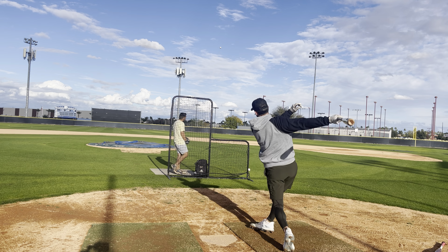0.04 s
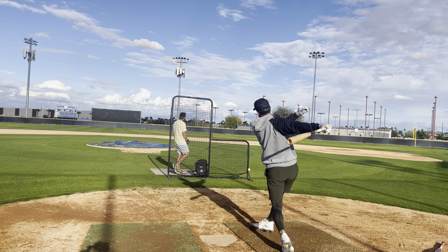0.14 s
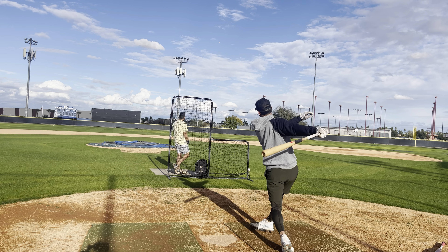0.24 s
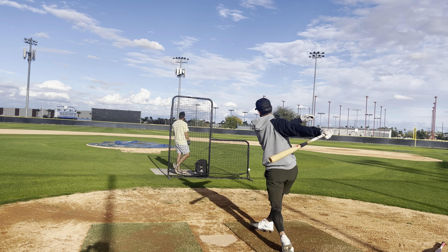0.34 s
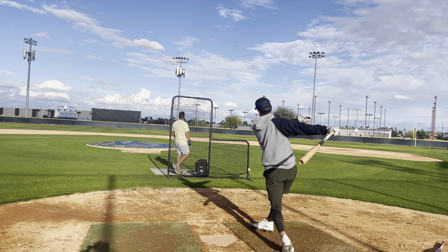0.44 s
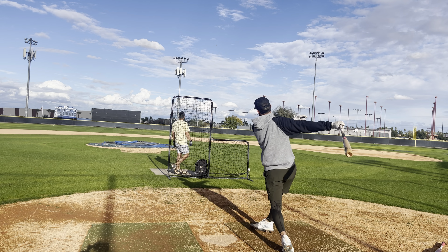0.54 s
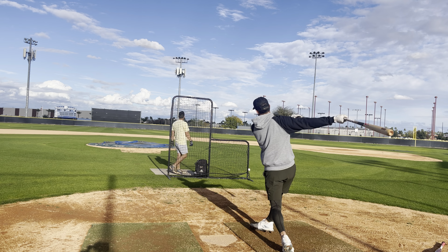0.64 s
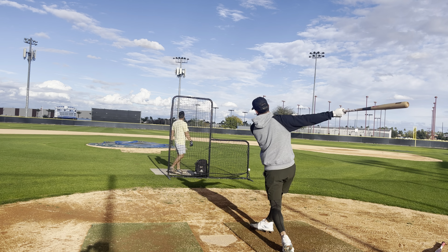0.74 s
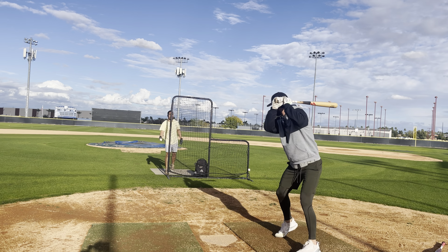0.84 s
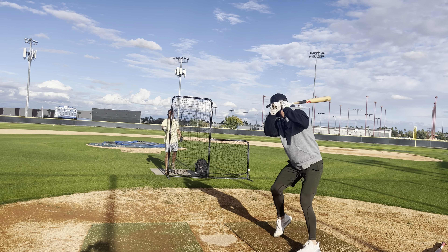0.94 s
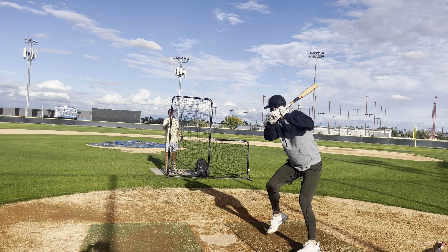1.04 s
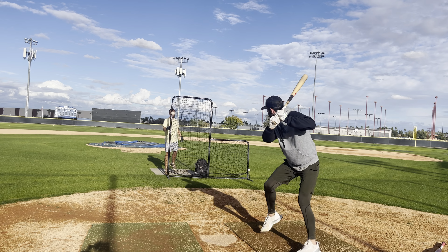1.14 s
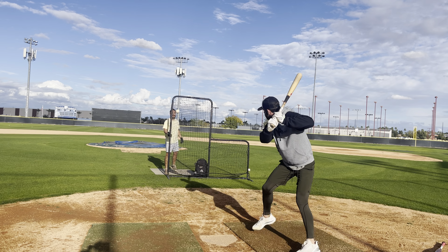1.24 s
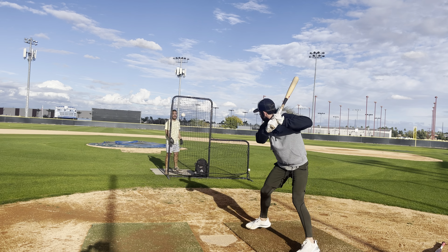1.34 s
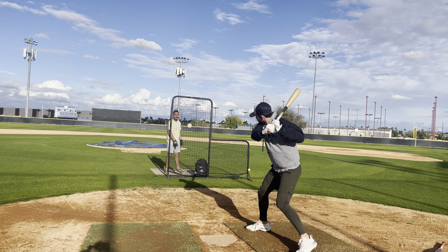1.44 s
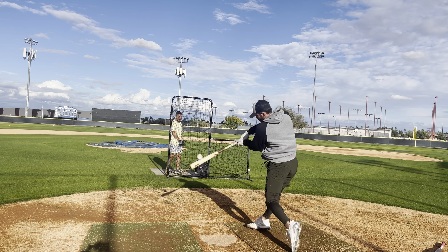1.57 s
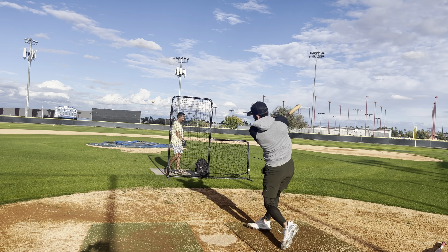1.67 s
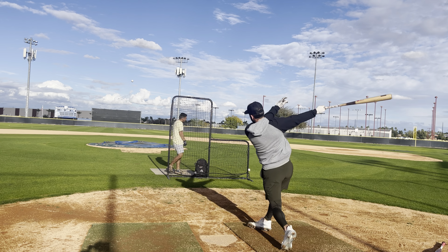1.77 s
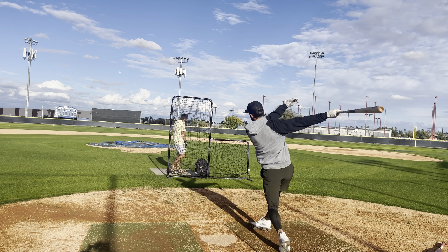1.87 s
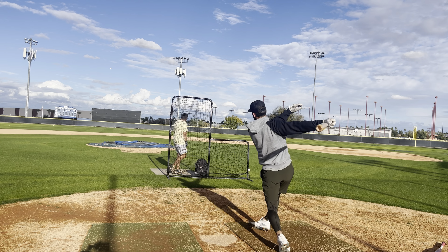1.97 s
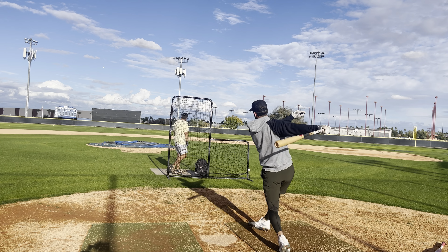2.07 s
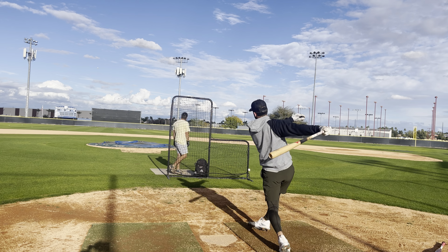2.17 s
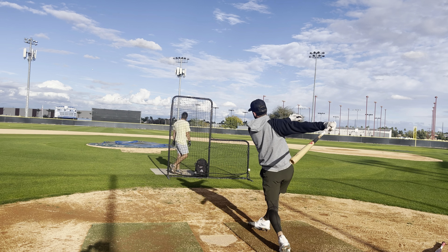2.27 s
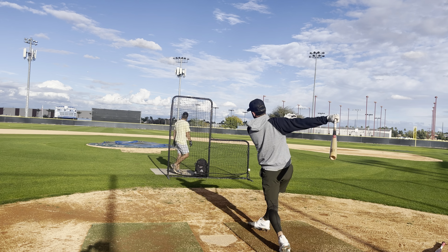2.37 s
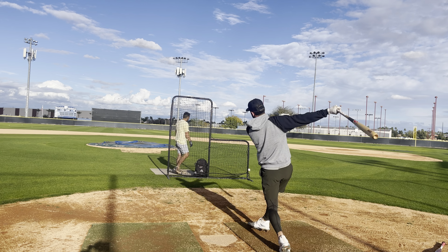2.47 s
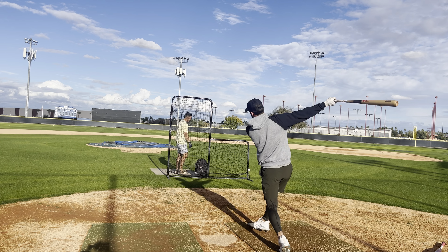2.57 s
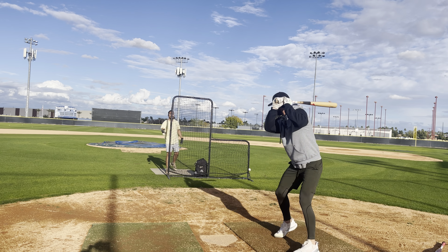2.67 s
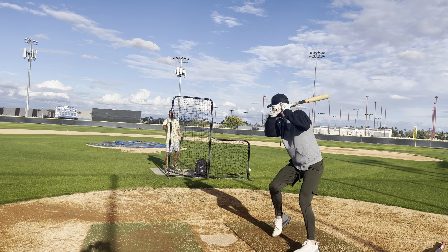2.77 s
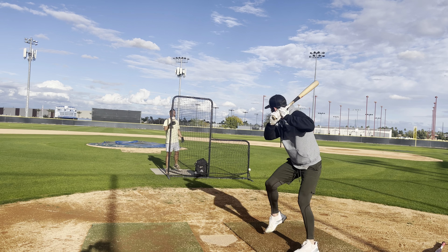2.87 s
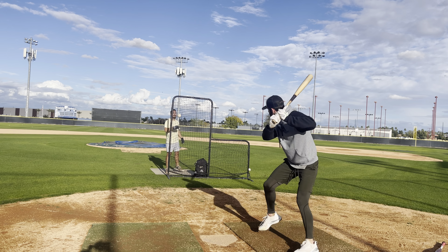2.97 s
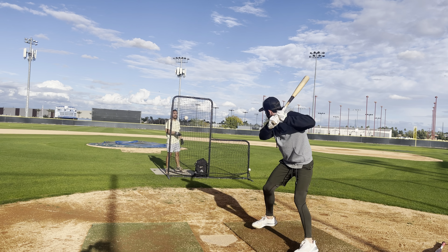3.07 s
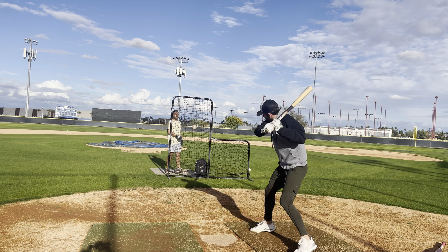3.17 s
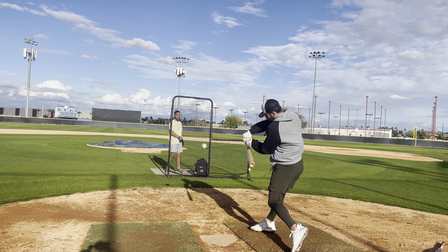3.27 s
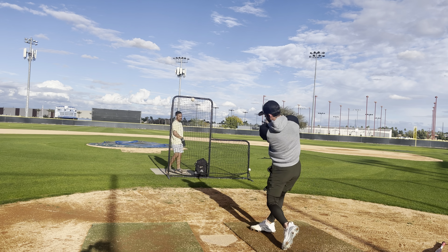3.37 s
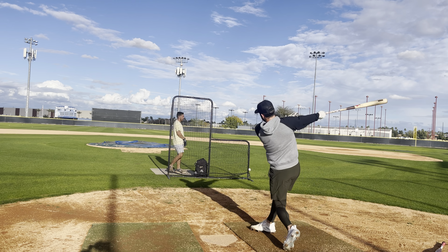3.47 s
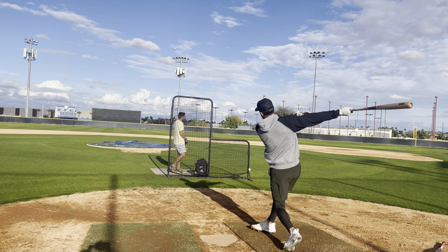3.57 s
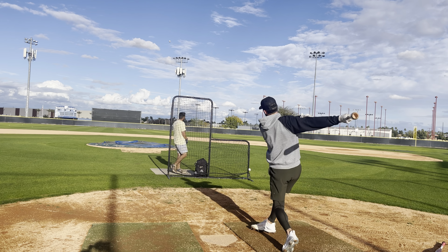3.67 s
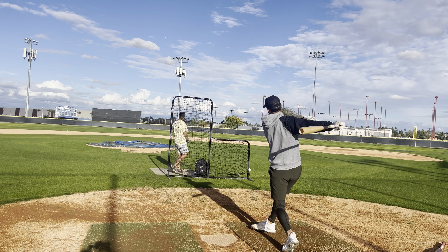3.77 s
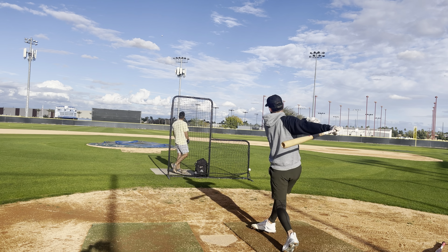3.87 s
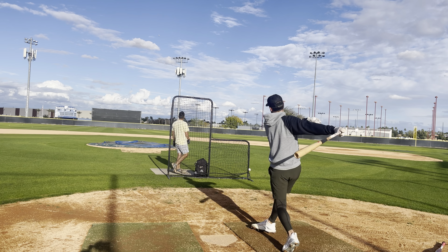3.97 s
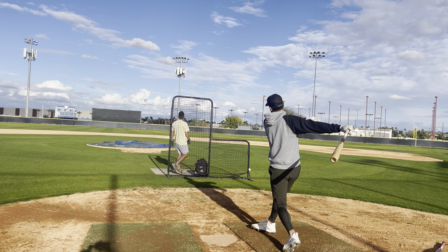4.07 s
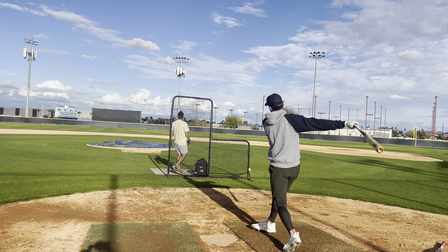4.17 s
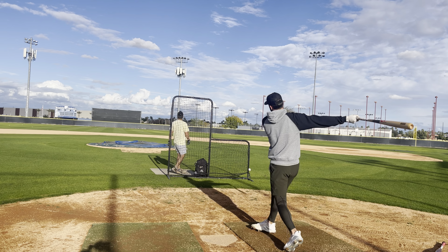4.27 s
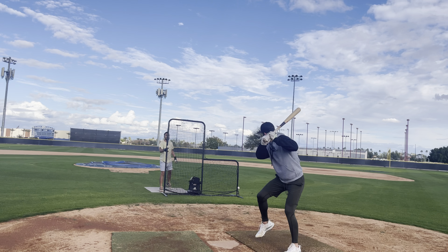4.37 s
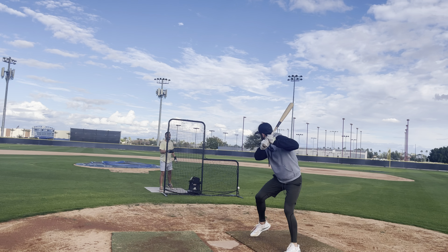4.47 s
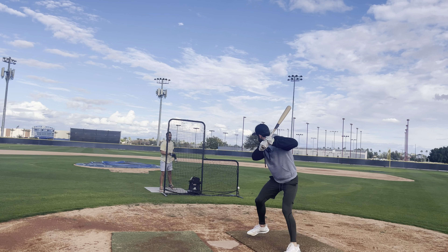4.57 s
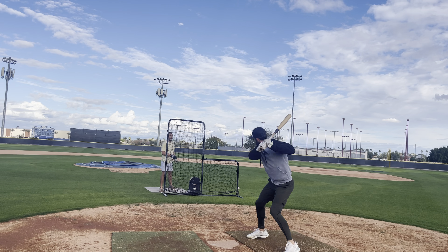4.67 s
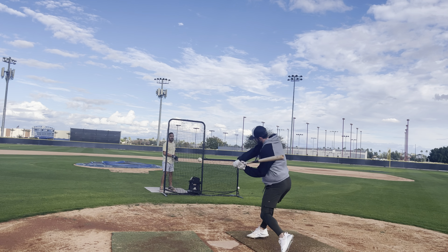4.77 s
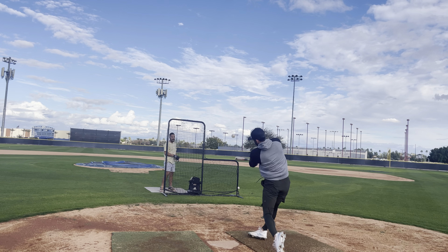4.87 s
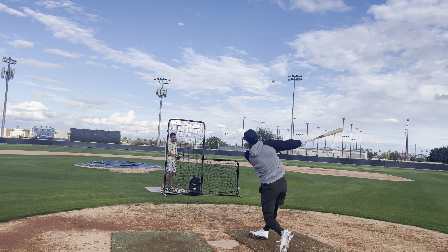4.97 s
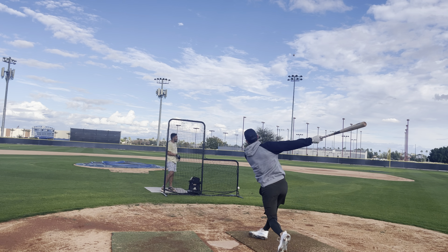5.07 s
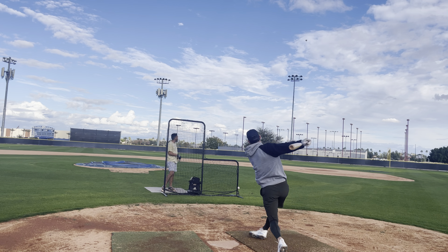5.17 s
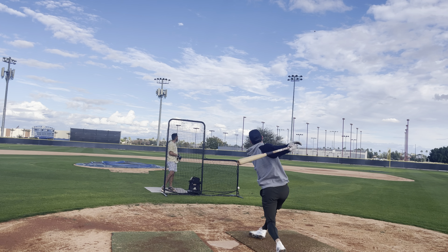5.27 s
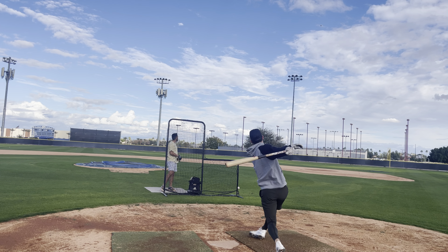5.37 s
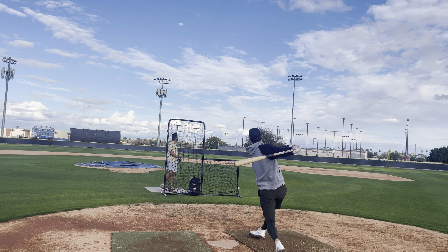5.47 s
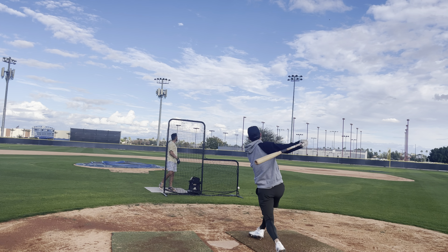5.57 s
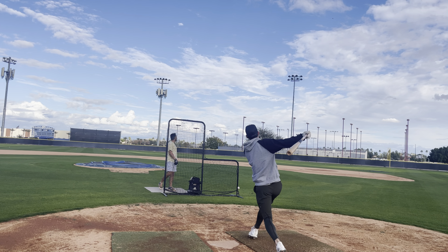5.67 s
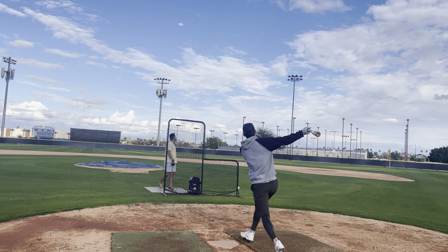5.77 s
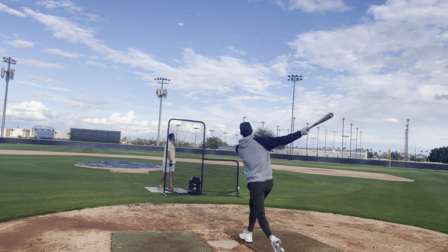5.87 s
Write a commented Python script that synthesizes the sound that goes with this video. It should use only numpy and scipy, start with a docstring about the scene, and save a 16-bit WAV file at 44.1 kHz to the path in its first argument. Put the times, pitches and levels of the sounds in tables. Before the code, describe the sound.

Three hard bat-on-ball cracks with quick slapping echoes, soft foot scuffs and cloth rustle between them, and a steady far drone beneath.

```python
"""A wooden bat cracks on tossed balls on an open field: each contact strikes the modes of the bat.
A screen, a stand and scattered walls throw the crack back as smeared echoes and a lumpy, dying scatter of noise.
The batter's clothes and shoes follow each swing as shaped noise, with short noise ticks and thuds.
Far machinery and traffic rumble on the right as a resonant drone and coloured noise, with a faint tone.
The level dips briefly three times, and a limiter ducks the field after each crack."""
import sys
import numpy as np
from scipy import signal
from scipy.fft import rfft, irfft
from scipy.io import wavfile

SR = 44100
rng = np.random.default_rng(int(sys.argv[2]) if len(sys.argv) > 2 else 0)


def file_out(sig):
    """Save sig as 16-bit WAV at sys.argv[1]."""
    # one column per channel
    cols = np.atleast_2d(sig).T
    # limit, then scale
    lim = np.clip(cols, -1, 1)
    pcm = np.round(lim * 32767).astype(np.int16)
    wavfile.write(sys.argv[1], SR, pcm)


N = 260631
T = np.arange(N) / SR

# bat on ball, the first before the start: start_s, level_db, stage_gap_s (between stages of the contact),
# push_db, body_db, thud_db, knock_db, ring_db, upper_ring_db, snap_db, high_snap_db,
# click_db (sent across the field), slap_db (off the stand), note_hz (strongest barrel note),
# note_width_hz, note_db, stand_delay_s, screen_db (return from the screen)
HITS = [(-.15, -35, .0015, -5, -5, -14, -19, 9, -3.5, -3, -5.5, -10, 2, 2360, 495, 15.5, 0.077, -26),
        (1.6091, -6.5, 0.0018, -2.5, -2.5, -4, 0.5, -6.5, 3, 0.5, 0.5, -6, -5.5, 1576, 300, 26.5, 0.083, -22.5),
        (3.3424, -6, .00143, -8.5, -4.5, -9.5, -6.5, -3.5, 0.5, 1.5, -1, -4, -6, 2162, 518, 22.5, .0822, -22.5),
        (4.866, -30.5, .00138, 18, 20, 12, 14.5, 13, 27, 24, 16.5, -2, 0.5, 2040, 600, 12, 0.08, -26.5)]
SCREEN_SHARE, SCREEN_SMEAR_S = .36, .002   # screen delay as share of the stand's; its smear
NOTE_FADE_T60_S = 0.6   # the barrel note carries less far than the click


def bat():
    """Direct cracks, their return from the screen, and the field answering a click and the barrel note."""
    out = np.zeros((2, N + 3 * SR))   # begins 1 s early
    click = np.arange(SR // 50) == 0
    age = T[:SR]
    for s, db, gap_s, *parts_db, click_db, slap_db, hz, width_hz, note_db, stand_s, screen_db in HITS:
        at = round((1 + s) * SR)
        hit = from_db(db) * crack(gap_s, parts_db)
        out[:, at:at + hit.shape[1]] += hit * from_db([[.6], [-.6]])

        mesh = rng.standard_normal((1, SR // 100)) * np.exp(-T[:SR // 100] / SCREEN_SMEAR_S)
        back = from_db(screen_db) * signal.fftconvolve(hit, mesh / np.linalg.norm(mesh), axes=1)
        screen_at = at + round(SCREEN_SHARE * stand_s * SR)
        out[:, screen_at:screen_at + back.shape[1]] += back

        field = from_db(click_db) * surroundings(stand_s, slap_db)
        note = from_db(note_db) * signal.lfilter(*signal.iirpeak(hz, hz / width_hz, SR), click)
        note_fade = from_db(-60 * np.maximum(age - stand_s, 0) / NOTE_FADE_T60_S)
        note_field = field * (age > SCREEN_SHARE * stand_s - .002) * note_fade
        out[:, at:at + SR] += field + signal.fftconvolve(note_field, note[None], axes=1)[:, :SR]
    return out[:, SR:SR + N]


# bat modes: pitch_hz, level_db
BAT_MODES = [(160, -18.5), (268, -9), (350, -20.5), (530, -27), (873, -6.5), (1086, -5.5), (1400, -8),
             (1622, -3.5), (2070, -4.5), (2855, -3.5), (3120, -6.5), (4090, -11.5), (5000, -4.5),
             (5875, -12.5), (6180, 0), (8100, -3), (8600, 2.5), (7400, -15), (9200, -10.5), (11900, -1.5)]
# the ball squashes and leaves, then the ground reflects: stage (in stage gaps), level_db, treble_db
CONTACT_STAGES = [(0, 6, -10.5), (0.999, -4, -10), (2.002, -21.5, -14), (3.001, -6, -13),
                  (3.999, -15.5, -15)]
# upper edges of push, body, thud, knock, ring, upper ring and snap: top_hz
PART_TOPS_HZ = [300, 600, 1300, 1900, 2500, 4000, 7000]
RING_CYCLES, LONGEST_T60_S = 10, 0.015   # modes fall 60 dB in this many cycles (snap: twice), up to the cap
WOOD_LATE_S, LATE_CYCLES = 0.00027, .8   # the wood answers just after the snap, its low modes last
STRIKE_SPREAD_DB = .8   # each stage strikes each mode a little differently
SNAP_SMEAR_S = 0.0014   # the snap splinters over a moment
CRACK_LAG_S = .0001   # left channel behind right for the treble of the crack


def crack(gap_s, parts_db):
    """Each stage of the contact sets damped bat modes ringing, with a burst of splintering noise."""
    size = SR // 20
    wood, bright = np.zeros((2, size))
    splinter = from_db(-16) * rng.standard_normal(size) * from_db(-60 * T[:size] / .03)
    splinter = signal.sosfilt(signal.butter(2, 12000, fs=SR, output="sos"), splinter)
    for k, (hz, level_db) in enumerate(BAT_MODES):
        clicks = np.zeros(size)
        snap = hz > PART_TOPS_HZ[-2]
        late_s = 0 if snap else WOOD_LATE_S + min(LATE_CYCLES / hz, .002)
        for stage, db, treble_db in CONTACT_STAGES:
            strike_db = db + treble_db * snap + STRIKE_SPREAD_DB * rng.standard_normal()
            clicks[round((stage * gap_s + late_s) * SR)] = from_db(strike_db)
        if snap:
            grains = rng.standard_normal(size // 8) * np.exp(-T[:size // 8] / SNAP_SMEAR_S)
            clicks = np.convolve(clicks, grains / np.linalg.norm(grains))[:size]
        part_db = parts_db[np.searchsorted(PART_TOPS_HZ, hz)]
        gain = (-1) ** k * from_db(level_db + part_db + 3)   # signs alternate from mode to mode
        mode = gain * ring(clicks, hz, min(RING_CYCLES / hz * (1 + snap), LONGEST_T60_S))
        if hz < PART_TOPS_HZ[3]:
            wood = wood + mode
        else:
            bright = bright + mode
    return wood + place(bright + splinter, bright + splinter, CRACK_LAG_S)


# hiss off the netting, its second bounce, the stand behind:
# delay_share (of the stand's delay), level_db, smear_s, left_lag_s
ECHOES = [(.353, -11, .008, .00015), (.657, -24, .008, .00015), (1, 2.5, .0006, .00023)]
FIELD_DB = -30   # shared level of scatter, far tail and nearby returns; theirs are relative to it
SCATTER_DB, SCATTER_T60_S, SCATTER_END_S = -6, 0.99, 0.36   # fades faster after the last building
DISTANT_DB, DISTANT_T60_S = -16.5, 4.2   # dull returns from far beyond the fence
NEARBY_DB, NEARBY_T60_S = -4, .16   # ground, batter and netting close by
WALLS_PER_S, WALL_DB, WALL_SPREAD_DB = 150, 11.5, 2   # separate reflections, before they are quartered
EARLY_DB, EARLY_S, EARLY_FADE_S = 6, 0.034, 0.0045   # the stand's rows scatter most, until after its slap
FADE_IN_DB, FADE_IN_S = -6, 0.0096   # the scatter fades in shortly before the slap


def surroundings(stand_s, slap_db):
    """Field's answer to a click: smeared echoes, lumpy scatter up to the last building, a dull far tail."""
    age = T[:SR]
    lumps = from_db(2.3 * drift(27)[:SR] + 0.86 * drift(120)[:SR])
    wall_gains = from_db(WALL_DB + WALL_SPREAD_DB * rng.standard_normal(SR))
    walls = (rng.random(SR) < WALLS_PER_S / SR) * wall_gains
    lumps = lumps * (0.94 + np.convolve(walls, np.exp(-T[:SR // 200] / 0.00075))[:SR] / 4)

    fade_db = -60 * age / SCATTER_T60_S - 150 * np.maximum(age - SCATTER_END_S, 0)
    fade_db += EARLY_DB * np.exp(-np.maximum(age - stand_s - EARLY_S, 0) / EARLY_FADE_S)
    fade_in = from_db(FADE_IN_DB) * np.clip(1 - (stand_s - age) / FADE_IN_S, 0, 1)
    started = np.where(age > stand_s, 1, fade_in)
    mid, side, far = rng.standard_normal((3, SR))
    far = signal.sosfilt(signal.butter(4, 3000, fs=SR, output="sos"), far)
    far = far * from_db(DISTANT_DB - 60 * age / DISTANT_T60_S)
    mid, side = np.array([mid, side]) * from_db(SCATTER_DB + fade_db)
    scatter = place(mid + .6 * side + far, mid - .6 * side + far, .00023)
    out = started * lumps * from_db(FIELD_DB) * scatter
    nearby_db = NEARBY_DB + FIELD_DB - 60 * age / NEARBY_T60_S
    out = out + from_db(nearby_db) * rng.standard_normal((2, SR))

    for share, db, smear_s, lag_s in ECHOES:
        echo, spread = np.zeros(SR), round(smear_s * SR)   # an uneven surface spreads the echo
        start = round(share * stand_s * SR)
        gain = from_db(db + slap_db * (share == 1))   # only the stand slaps
        echo[start:start + spread] = gain * rms_one(rng.standard_normal(spread)) / np.sqrt(spread)
        out = out + place(echo, echo, lag_s)
    out = signal.sosfilt(signal.butter(4, 8000, fs=SR, output="sos"), out)
    return signal.sosfilt(signal.butter(2, [800, 6500], "band", fs=SR, output="sos"), out)


# cloth and grit: pitch_hz, level_db (per Hz)
RUSTLE_COLOUR = [(1500, -30), (3000, 1.5), (5000, 1.5), (7000, -2.5), (8500, 10), (10300, -4), (11500, 10),
                 (12000, -4.5), (12500, -52), (16000, -59)]
# airy whoosh: pitch_hz, level_db (per Hz)
WHOOSH_COLOUR = [(150, -18.5), (300, -3.5), (600, -0.5), (1000, -2.5), (1800, -2.5), (3000, -10),
                 (5000, -58)]
BATTER_LAG_S = .00015   # left channel behind right


def batter():
    """Grainy rustle and whoosh, noise shaped by the swing; ticks and thuds lie on top."""
    rustle, whoosh = movement()
    alike = [(300, 0.21), (8000, 0.037)]   # pitch_hz, left-right likeness
    grit = from_db(2.0 * drift(82))   # cloth and sand come in grains
    out = rustle * grit * coloured(RUSTLE_COLOUR, 0.5, BATTER_LAG_S, alike)
    out += whoosh * grit * coloured(WHOOSH_COLOUR, 1.8, BATTER_LAG_S, alike)
    return out + ticks() + thuds()


# the swing that leads to each hit: land_s (front foot), scuff_db, coil_db, turn_db, follow_db, settle_db
SWINGS = [(-.35, -60, -62, -40, -65.5, -64), (1.401, -89, -65, -50, -56, -65),
          (3.153, -54, -63, -53.5, -59.5, -62), (4.682, -59, -61.5, -53, -58, -70)]
# shuffles between swings: start_s, length_s, rustle_db, whoosh_db
SHUFFLES = [(0.024, 0.012, -100, -70), (0.887, 0.25, -80, -94), (2.712, 0.16, -73.5, -66),
            (4.374, 0.026, -75, -98.5), (5.334, 0.03, -76, -96.5), (5.585, 0.044, -70, -77.5),
            (5.62, 0.038, -62.5, -59), (5.755, 0.059, -66.5, -65), (5.88, 0.047, -68.5, -93)]
LAND_S, FOLLOW_S = 0.021, 0.18   # how long each is held
LAND_T60_S, COIL_T60_S, TURN_T60_S = 0.024, 0.05, 0.12
FOLLOW_T60_S, SETTLE_T60_S, SHUFFLE_T60_S = 0.57, 8, 0.25
STRIDE_S, TURN_LEAD_S = 0.06, .078   # stride swells up to the landing; body turns this long before contact
SWELL_S, SWELL_DB = 0.087, 10.5   # airy noise swells up to the crack, this far above the turn's rustle
# how far the whoosh lies above the rustle in each stage (dB)
LAND_AIR_DB, COIL_AIR_DB, TURN_AIR_DB, FOLLOW_AIR_DB, SETTLE_AIR_DB = 1, 4.5, -5, 3, 25


def movement():
    """Gains of rustle and whoosh: stride, land, coil, turn, follow through, settle; shuffles between."""
    gains = sum(burst(s, s + length, SHUFFLE_T60_S, db) for s, length, *db in SHUFFLES)
    for (hit, *_), (land, scuff_db, coil_db, turn_db, follow_db, settle_db) in zip(HITS, SWINGS):
        turn, followed = hit - TURN_LEAD_S, hit + FOLLOW_S
        gains = gains + burst(land, land + LAND_S, LAND_T60_S, [scuff_db, scuff_db + LAND_AIR_DB])
        gains += burst(land - STRIDE_S, turn, COIL_T60_S, [coil_db, coil_db + COIL_AIR_DB], STRIDE_S)
        gains += burst(turn, hit, TURN_T60_S, [turn_db, turn_db + TURN_AIR_DB])
        gains += burst(hit - SWELL_S, hit, LAND_T60_S, [turn_db - 16.5, turn_db + SWELL_DB], SWELL_S)
        gains += burst(hit, followed, FOLLOW_T60_S, [follow_db, follow_db + FOLLOW_AIR_DB])
        gains += burst(hit, followed, SETTLE_T60_S, [settle_db - SETTLE_AIR_DB, settle_db])
    return gains


ATTACK_S, SWELL_POWER = 0.019, 2.5   # bursts start softly


def burst(start, end, t60, db, attack=ATTACK_S):
    """Rise from start, held to end, then dying away; db holds one level per layer."""
    rise = np.clip((T - start) / attack, 0, 1) ** SWELL_POWER
    shape = rise * from_db(-60 * np.maximum(T - end, 0) / t60)
    return from_db(db)[:, None] * shape


# ticks of cleats, gravel and grip: start_s, dull_db (peak), dull_hz, bright_db (rms of its first 5 ms)
TICKS = [(0.0561, -41.5, 1470, -74), (0.0774, -47, 1330, -82), (0.142, -47.5, 1240, -81),
         (0.293, -70, 1330, -68), (0.429, -46, 2120, -79), (0.439, -44.5, 2330, -84),
         (0.5109, -50.5, 1450, -80), (0.546, -49, 2180, -87), (1.128, -54, 1260, -68),
         (1.28, -56, 1940, -60.5), (1.3304, -51, 1540, -61), (1.3755, -50, 1580, -58),
         (1.405, -61, 1540, -59), (1.4124, -61, 1760, -74), (1.529, -40.5, 1920, -39.5),
         (1.538, -46, 2000, -51), (1.681, -57, 2400, -45), (1.7917, -54, 2050, -49),
         (1.844, -59, 1640, -52), (1.9734, -68, 1790, -76), (2.174, -63, 4000, -87),
         (2.309, -47.5, 1939, -88), (2.318, -63, 3500, -87), (2.416, -72, 2000, -75),
         (2.7604, -45, 1970, -40), (2.796, -65, 1240, -62), (3.07, -48, 1495, -62.5),
         (3.1116, -52, 1400, -60.5), (3.1283, -49, 1680, -55.5), (3.146, -51, 4500, -70),
         (3.1593, -44, 1240, -60), (3.271, -41.5, 1210, -56), (3.279, -40.5, 1900, -41.5),
         (3.288, -37, 4500, -49), (3.667, -42.5, 2240, -81), (3.7595, -43, 1280, -62),
         (3.759, -52, 3580, -70), (3.904, -71, 1193, -74), (3.9117, -52.5, 3090, -84.5),
         (3.929, -55.5, 3200, -89), (4.041, -48, 2490, -95), (4.051, -50, 2500, -90),
         (4.1875, -51.5, 1250, -71.5), (4.3612, -62, 1470, -65), (4.3779, -59, 1270, -69),
         (4.403, -67, 1483, -69), (4.416, -61.5, 3500, -72), (4.448, -60.5, 4500, -84.5),
         (4.591, -55, 4460, -71), (4.668, -67, 3900, -77), (4.682, -62, 1910, -53.5),
         (4.697, -64, 1900, -59), (4.785, -38.5, 1520, -41.5), (4.8207, -41, 1710, -68),
         (5.156, -40.5, 4100, -70), (5.1844, -42, 2980, -72), (5.347, -72, 5000, -62.5),
         (5.354, -60, 5200, -68), (5.424, -59, 4250, -90), (5.433, -60, 3000, -90), (5.559, -56, 1410, -60),
         (5.572, -54, 2740, -89), (5.744, -69, 5200, -74)]
BRIGHT_T60_S = .011
BRIGHT_PEAK_HZ, BRIGHT_PEAK_DB = 9500, 2.5   # grit rings highest here
GRAINS_PER_S, GRAIN_HZ, GRAIN_DB, GRAIN_SPREAD_DB = 9.8, 2840, -68.5, -1.5   # stray faint ticks


def ticks():
    """Noise puffs with a dull and a bright part, and faint dull ones at random."""
    dull, bright = np.zeros((2, N))
    for s, dull_db, hz, bright_db in TICKS:
        at = round(s * SR)
        high = puff(BRIGHT_T60_S, 2700, 11300)
        peak = signal.iirpeak(BRIGHT_PEAK_HZ, 3.0, SR)
        high = high + from_db(BRIGHT_PEAK_DB) * signal.lfilter(*peak, high)
        dull[at:at + len(high)] += from_db(dull_db) * knock(hz)
        bright[at:at + len(high)] += from_db(bright_db) * high / np.std(high[:SR // 200])
    grain_gains = from_db(GRAIN_DB + GRAIN_SPREAD_DB * rng.standard_normal(N))
    stray = (rng.random(N) < GRAINS_PER_S / SR) * grain_gains
    return dull + signal.fftconvolve(stray, knock(GRAIN_HZ))[:N] + place(bright, bright, BATTER_LAG_S)


DULL_OCTAVES, DULL_T60_S = 1.03, 0.021   # bandwidth and decay


def knock(hz):
    """The dull part of a tick: a dying noise band about an octave wide, peak 1."""
    sound = puff(DULL_T60_S, hz * 2 ** (-DULL_OCTAVES / 2), hz * 2 ** (DULL_OCTAVES / 2))
    return sound / np.abs(sound).max()


def puff(t60, low_hz, high_hz):
    """A 25 ms dying burst of noise in a steep band."""
    size = SR // 40
    noise = rng.standard_normal(size) * from_db(-60 * T[:size] / t60)
    return signal.sosfilt(signal.butter(3, [low_hz, high_hz], "band", fs=SR, output="sos"), noise)


# soft thuds of feet, body and bat handle: start_s, level_db (peak), pitch_hz
THUDS = [(1.411, -42, 800), (1.541, -41, 278), (3.163, -34.5, 360), (3.166, -47, 900), (3.195, -42.5, 700),
         (3.272, -41, 700), (3.393, -30, 400), (4.683, -33.5, 302), (4.695, -40.5, 160), (4.854, -40, 900),
         (5.028, -38, 1800), (5.04, -40, 1980), (5.769, -36.5, 330), (5.775, -43.5, 1086)]
THUD_CYCLES = 21   # cycles for the noise to fall 60 dB


def thuds():
    """Short noise puffs banded around a low pitch, dying faster the higher they are."""
    out = np.zeros(N)
    for s, db, hz in THUDS:
        at = round(s * SR)
        low = puff(THUD_CYCLES / hz, hz / 2.0, hz * 1.4)
        out[at:at + len(low)] += from_db(db) * low / np.abs(low).max()
    return out


# left-right colour of what is close by: pitch_hz, balance_db (left minus right)
NEAR_BALANCE = [(1200, -3), (2000, 3.5), (2900, 4), (3800, -3), (5000, -11.5), (7000, -1.5), (10000, 1)]


def near_balance(pair):
    """The two channels colour what comes from close by differently."""
    tilt_db = at_hz(NEAR_BALANCE, np.maximum(np.fft.rfftfreq(N, 1 / SR), 1)) / 2
    return irfft(rfft(pair) * from_db([tilt_db, -tilt_db]), N)


# far rumble, steady from one dip to the next: start_s, drone_db, traffic_db
FAR_LEVELS = [(0, -39.5, -42), (.871, -40.5, -42), (2.674, -34.5, -44.5), (4.341, -42.5, -43.5)]
# traffic roar: pitch_hz, level_db (per Hz)
TRAFFIC_COLOUR = [(15, -49.5), (28, -31.5), (45, -5.5), (75, 0.5), (110, -2), (200, -10), (400, -18.5),
                  (800, -28), (1600, -38.5), (2600, -46.5), (3300, -59.5), (4500, -59), (8000, -61),
                  (12000, -64), (13000, -81.5), (15000, -99)]
# how alike left and right are: pitch_hz, likeness (0 to 1)
TRAFFIC_LIKENESS = [(60, 1), (150, .93), (400, 0.87), (1500, 0.46), (6000, 0.56)]
# a faint far tone: start_s, end_s, level_db
BEEPS = [(.885, 1.02, -62), (1.085, 1.21, -64)]
BEEP_HZ = 888
DRONE_HZ, DRONE_WIDTH_HZ = 75.8, 14.5   # width of one pass through the resonance
TRAFFIC_LAG_S = .00047   # left channel behind right


def far_field():
    """An unsteady drone (noise twice through a narrow resonance), traffic roar, murmur and a faint tone."""
    starts, *levels = np.transpose(FAR_LEVELS)
    stretch = np.clip(np.searchsorted(starts, T) - 1, 0, None)
    drone_db, traffic_db = np.array(levels)[:, stretch]
    t60 = np.log(1000) / (np.pi * DRONE_WIDTH_HZ)
    resonant = ring(ring(rng.standard_normal(2 * N), DRONE_HZ, t60), DRONE_HZ, t60)
    drone = from_db(drone_db) * rms_one(resonant[N:])   # the build-up is left out
    beep_gain = sum(from_db(db) * np.clip(np.minimum(T - a, b - T) / 0.0075, 0, 1) for a, b, db in BEEPS)
    hum = drone + beep_gain * np.sin(2 * np.pi * BEEP_HZ * T)
    traffic = from_db(traffic_db) * coloured(TRAFFIC_COLOUR, 1.0, TRAFFIC_LAG_S, TRAFFIC_LIKENESS)
    out = place(hum, hum, TRAFFIC_LAG_S) + traffic + murmur(stretch)
    return out * from_db([[-.75], [.75]])


# bands that swell and sink in the far roar: pitch_hz, then level_db for each stretch between dips
MURMUR = [(216, -60.5, -60, -58, -58.5), (352, -69.5, -66.5, -73, -54), (600, -67, -64.5, -82, -68.5),
          (880, -62, -59.5, -59.5, -61)]
MURMUR_SWELL_DB = 3.5
MURMUR_SHARPNESS = 2.2   # centre over width


def murmur(stretch):
    """Noise twice through broad resonances, mid and side of each band swelling together."""
    out = 0
    for hz, *db in MURMUR:
        peak = signal.iirpeak(hz, MURMUR_SHARPNESS, SR)
        band = signal.lfilter(*peak, signal.lfilter(*peak, rng.standard_normal((2, N))))
        mid, side = rms_one(band) * from_db(np.array(db)[stretch] + MURMUR_SWELL_DB * drift(2.3))
        out = out + place(mid + 0.41 * side, mid - 0.22 * side, TRAFFIC_LAG_S)
    return out


def from_db(db):
    """dB to gain."""
    return 10 ** (np.asarray(db) / 20)


def rms_one(x):
    """Scale to rms 1."""
    return x / np.sqrt(np.mean(x ** 2) + 1e-20)


def at_hz(points, hz):
    """Read a spectrum on a log frequency axis."""
    points = np.array(points)
    return np.interp(np.log(hz), np.log(points[:, 0]), points[:, 1])


def drift(rate_hz):
    """Slow random wander of spread 1: noise twice through a one-pole lowpass, at every 40th sample."""
    r = np.exp(-80 * np.pi * rate_hz / SR)
    slow = signal.lfilter([1], [1, -2 * r, r * r], rng.standard_normal(N // 40 + 2002))[2000:]
    return np.interp(np.arange(N) / 40, np.arange(len(slow)), rms_one(slow))


def ring(clicks, hz, t60):
    """Two-pole resonator: a unit click sets a dying sine of height 1 ringing."""
    r, w = from_db(-60 / (t60 * SR)), 2 * np.pi * hz / SR
    return signal.lfilter([0, np.sin(w)], [1, -2 * r * np.cos(w), r * r], clicks + 1e-18)


def place(left, right, lag_s):
    """Stereo pair in which the left channel comes lag_s later."""
    lag = round(lag_s * SR)
    return np.array([np.roll(left, max(lag, 0)), np.roll(right, max(-lag, 0))])


def coloured(spectrum, patchy_db, lag_s, alike):
    """Bands of stereo noise that flicker and arrive from one side; rms 1."""
    hz = np.maximum(np.fft.rfftfreq(N, 1 / SR), 1)
    share = np.clip(at_hz(alike, hz), 0, 1)
    mid, side = rfft(rng.standard_normal((2, N))) * from_db(at_hz(spectrum, hz))
    pair = np.sqrt(1 + share) * mid + np.sqrt(1 - share) * side * [[1], [-1]]
    edges_hz = [0, 120, 350, 900, 2200, 5000, SR]
    together = drift(5)
    out = 0
    for low, high in zip(edges_hz, edges_hz[1:]):
        band = irfft(pair * ((hz >= low) & (hz < high)), N)
        out = out + band * from_db(patchy_db * (0.16 * together + drift(6.6)))
    return rms_one(place(*out, lag_s))


def scene():
    """Bat and batter close by, over the far rumble."""
    return near_balance(bat() + batter()) + far_field()


# brief dips in level, fade out and in: centre_s, half_length_s
DIPS = [(0.869, 0.034), (2.672, 0.025), (4.341, 0.036)]
CUTOFF_HZ = 16900


def record(dry):
    """Limiter with slow release, the dips, a clip and the top cut."""
    over_db = np.maximum(20 * np.log10(np.abs(dry).max(0) + 1e-9) + 16, 0)   # above -16 dB
    release_db = 110 * T   # falling back 110 dB per second
    held_db = np.maximum(np.maximum.accumulate(over_db + release_db) - release_db, 0)
    r = np.exp(-1 / (0.042 * SR))   # slow enough that the gain falls after the crack has passed
    gain = from_db(-.9 * signal.lfilter([1 - r], [1, -r], held_db))
    for s, half_s in DIPS:
        gain = gain * np.clip(np.abs(T - s) / half_s, .08, 1)
    clipped = np.clip(dry * gain, -.75, .75)
    return signal.sosfilt(signal.cheby2(12, 70, CUTOFF_HZ, fs=SR, output="sos"), clipped)


dry = scene()
out = record(dry)
file_out(out)
```